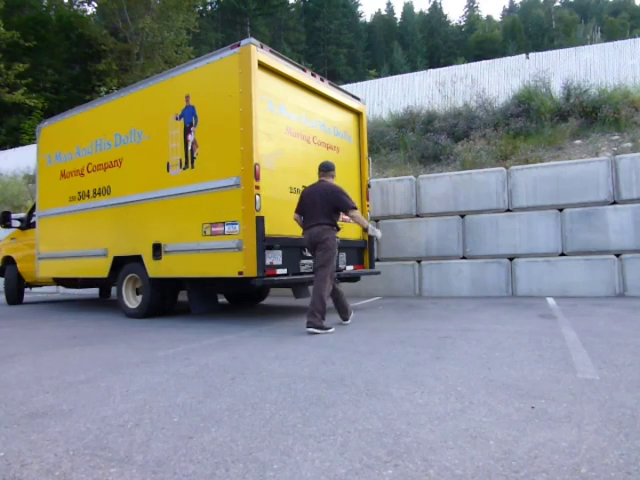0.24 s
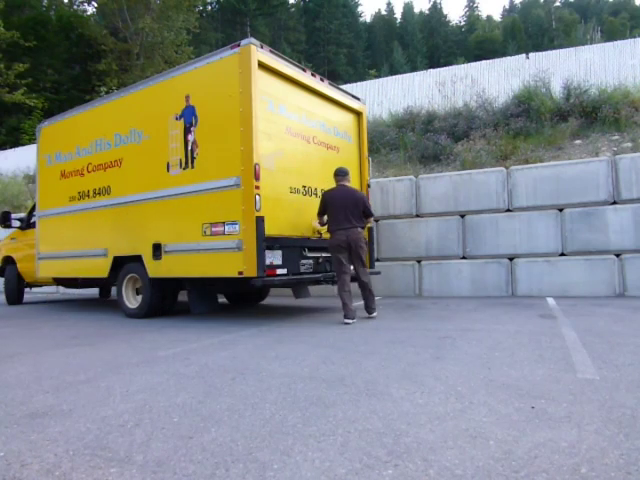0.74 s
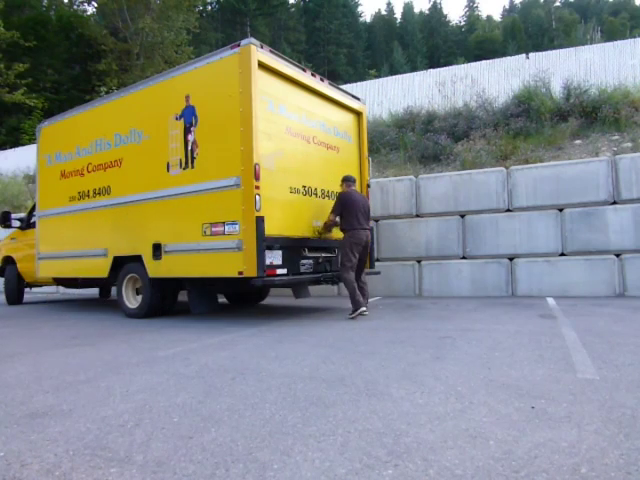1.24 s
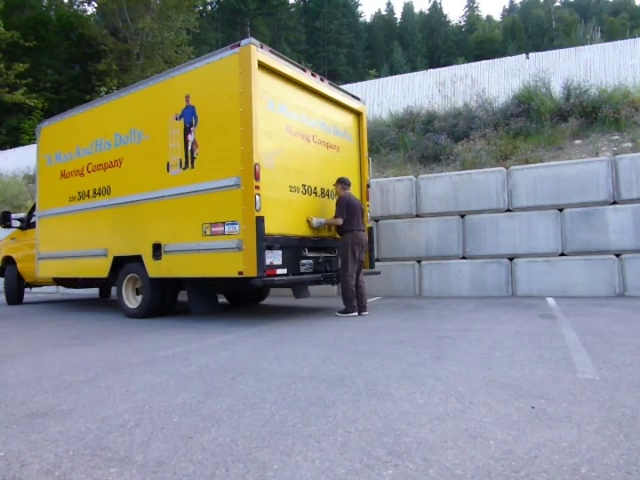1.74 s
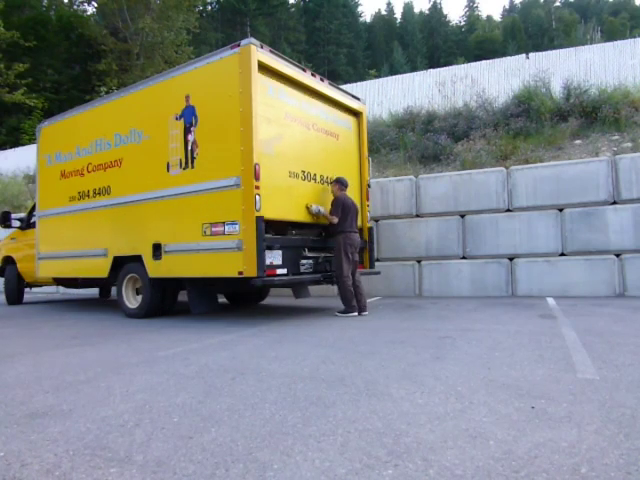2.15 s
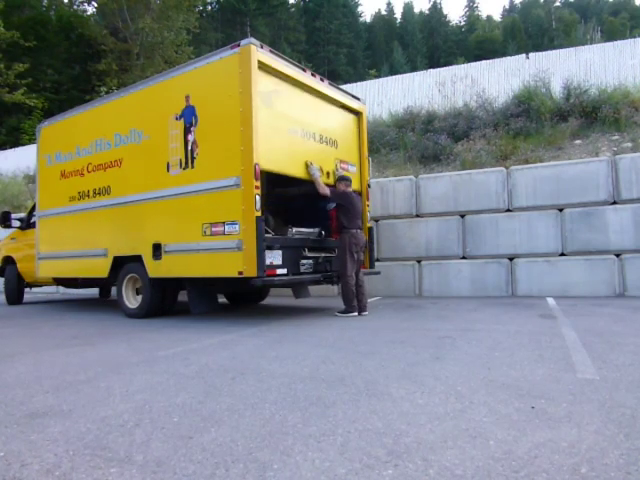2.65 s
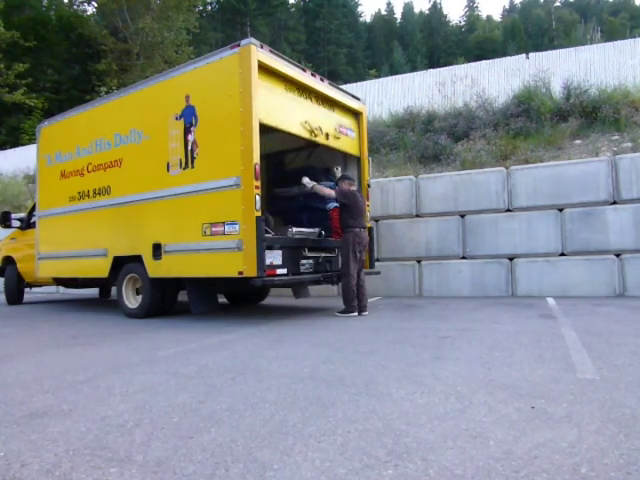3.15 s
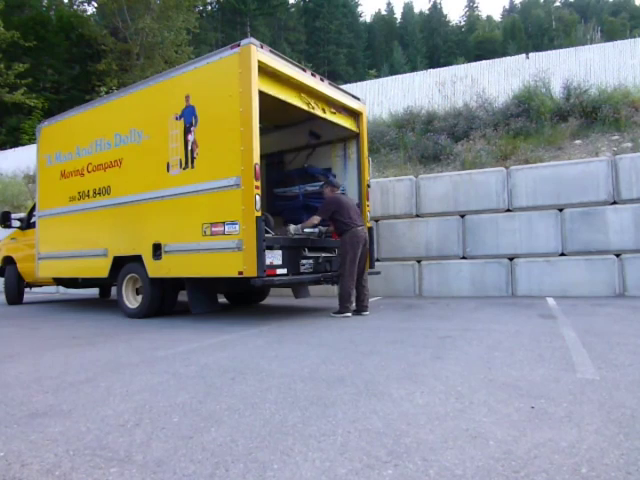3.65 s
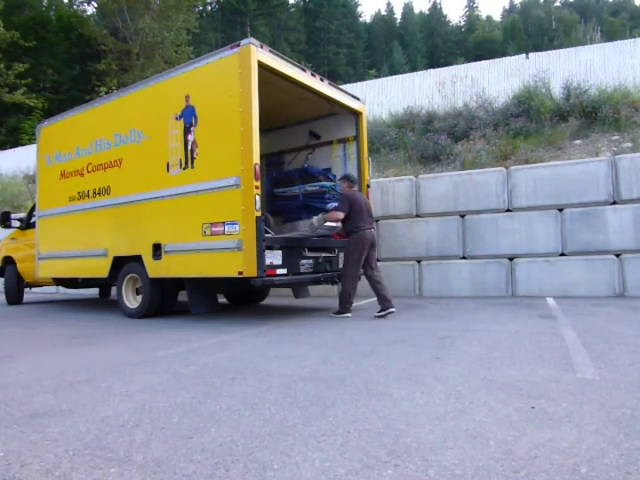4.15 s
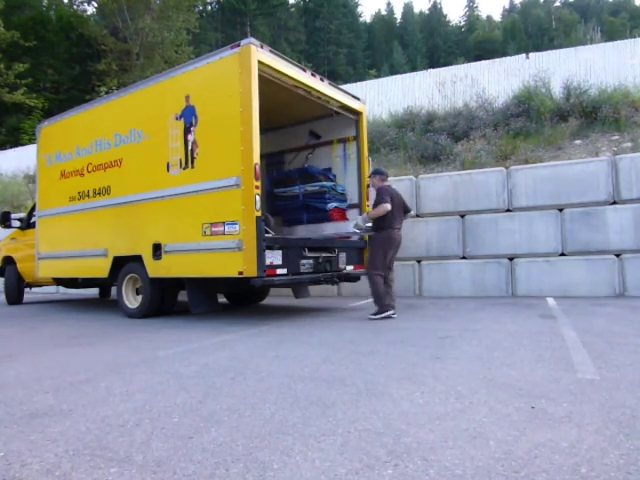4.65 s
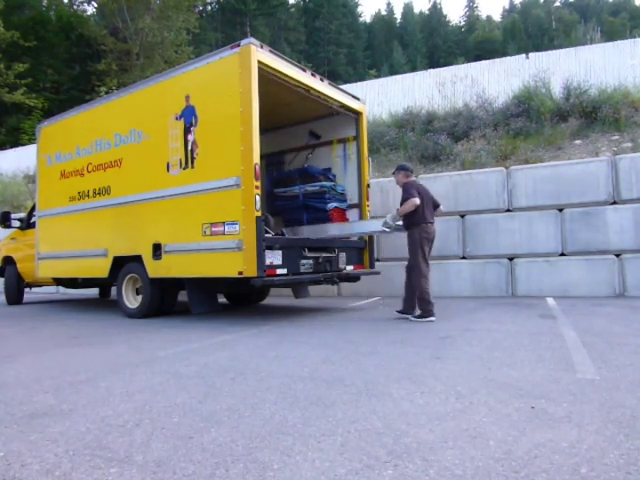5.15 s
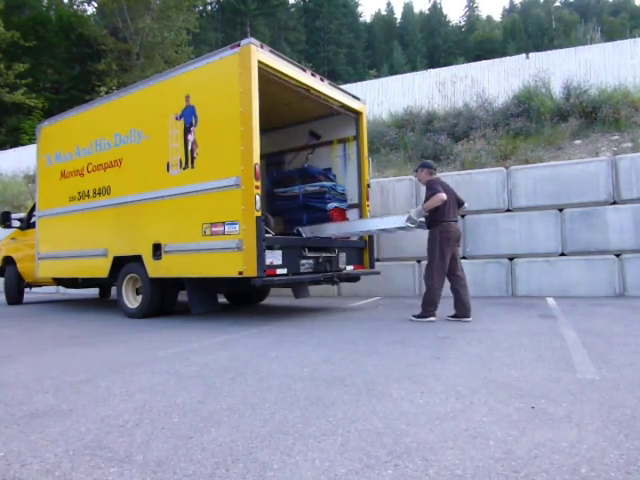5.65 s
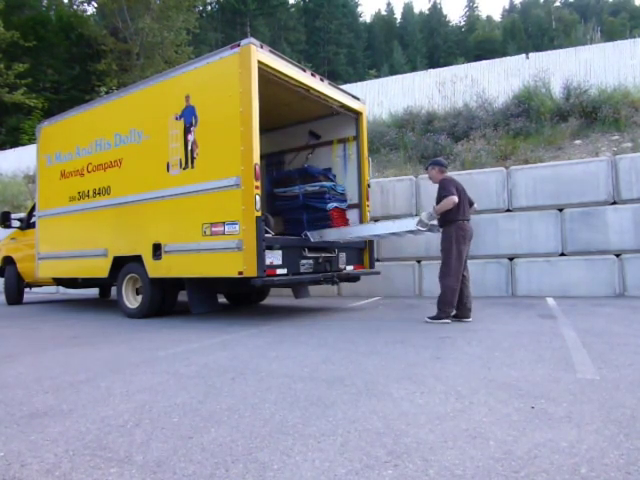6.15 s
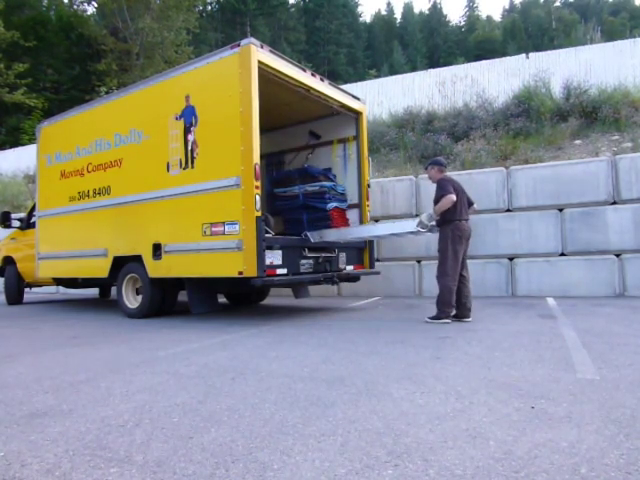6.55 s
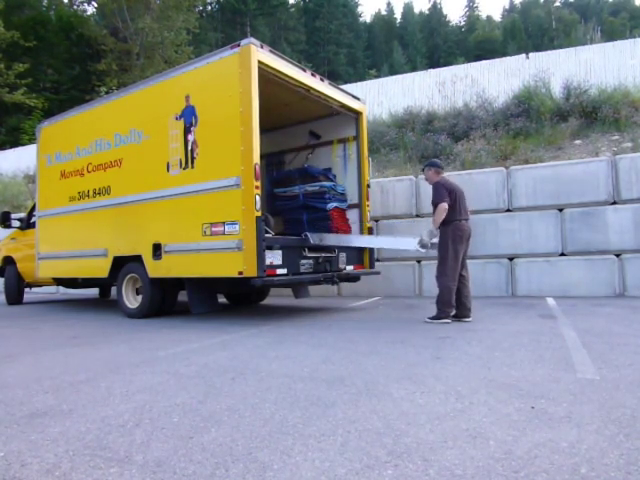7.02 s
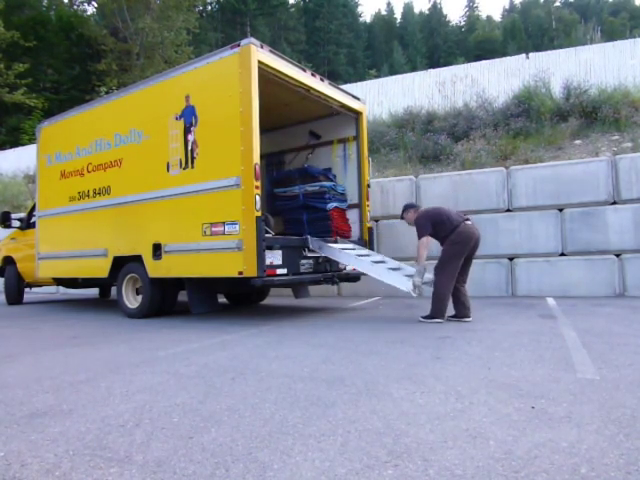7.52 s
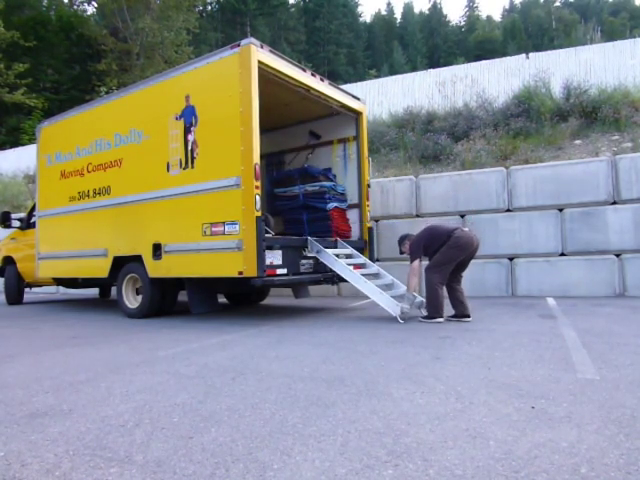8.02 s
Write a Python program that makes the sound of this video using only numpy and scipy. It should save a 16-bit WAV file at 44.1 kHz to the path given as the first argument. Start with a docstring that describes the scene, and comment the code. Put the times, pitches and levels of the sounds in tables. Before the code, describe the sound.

A parking lot with a soft, steady outdoor hush, heard in stereo a few metres from a box truck almost straight ahead. Near 0.9 s a dull bump on the door panel; from 1.06 to 1.85 s irregular steel latch blows crack, clang and ring with rattling fittings. A clink at 2.1 s, then the roll-up door rises, its rollers ticking and rattling, panels knocking hardest around 2.6 to 3.2 s, with a short squeak at 2.75 s and more knocks and clinks until 3.7 s. From 4 to 5.4 s an aluminium ramp breaks loose with a scrape and high squeak, rumbling and booming hollowly in gliding pitches. Loud ringing bangs and chatter cluster at 5.4 to 6.05 s. Faint scrape and touches come near 6.6 s, a faint low squeak and hook clanks at 7.2 to 7.4 s, and a short ringing clank on asphalt at 8.1 s.

```python
"""A parking lot, a few metres from a box truck almost straight ahead of a stereo microphone. Blows crack and
ring its steel latch, then the roll-up door rattles up its tracks as rollers jolt it and panels knock.
An aluminium ramp rumbles out on its rollers and booms in its hollow channel, bangs against its stops, drops
onto its hooks and meets the asphalt. Each metal blow is banded noise that dies away, with ringing sines.
Fittings clink, dry joints squeak, and a soft outdoor hush of shaped noise lies behind."""
import sys
import numpy as np
from scipy import signal
from scipy.fft import rfft, irfft, next_fast_len
from scipy.io import wavfile
from scipy.ndimage import uniform_filter1d

SR = 44100
rng = np.random.default_rng(int(sys.argv[2]) if len(sys.argv) > 2 else 0)


def store_wav(level_fs):
    """Save 16-bit WAV to argv[1]."""
    pcm = np.round(np.clip(np.atleast_2d(level_fs), -1, 1) * 32767)
    wavfile.write(sys.argv[1], SR, pcm.T.astype(np.int16))


N = 365148

# Ramp blows at the stops, at full length, lifted, on the hooks, on the asphalt:
# [t/s, level/dB, hardness/dB, rail ring re level/dB]
RAMP_BLOWS = [(5.435, -19, -4.5, -17), (5.47, -11.5, -2.5, -5), (5.503, -19, -2, -35),
              (5.553, -15, -3.5, -30), (5.606, -13, -1.5, -31), (5.626, -12.5, 2.5, -31),
              (5.696, -16.5, -1.5, -45), (5.928, -10, 2.5, -30), (5.948, -12, 0.5, -12),
              (6.006, -15, 2, -0.5), (6.041, -17.5, 3, -3), (6.558, -24, 0, -40), (6.682, -28.5, -10.5, -7),
              (7.303, -16.5, 1, -30), (7.346, -15, -4.5, -19), (7.37, -17.5, 5.5, -11),
              (7.385, -23, 4.5, -10), (8.094, -20, -1.5, -6), (8.112, -15, 1.5, 0.5),
              (8.126, -25.5, -3.5, -6)]
# Side rails and foot of the ramp: [f/Hz, relative level/dB, t60/s]
RAIL_MODES = [(517, -11, .3), (582, -12, .45), (678, -6, .3), (790, -3, .33), (825, -1, .5), (866, 0, .25),
              (937, -8, .2), (1025, -7, .25), (1275, -11, .2), (1486, -16, .4), (2383, -22, .45)]
# Hollow channel that holds the ramp: [f/Hz at rest, relative level/dB, t60/s]
CHANNEL_MODES = [(260, -5, 0.26), (284.4, -5, 0.34), (318.3, 2.5, 0.2), (400, -4.5, 0.23),
                 (443.5, -11, 0.55), (624, -8, 0.18)]
# Main channel resonance as the ramp bears on other spots; the other modes shift in step: [t/s, f/Hz]
CHANNEL_PITCH = [(4.0, 317), (4.151, 300.6), (4.551, 385.3), (4.849, 320.9), (5.301, 314.2), (5.55, 408.8)]
# Boom of the channel as the ramp bears down on it: [t/s, level/dB]
BOOM = [(3.95, -36), (3.995, -16), (4.17, -14), (4.22, -21), (4.48, -21.5), (4.545, -15), (4.59, -27.5),
        (4.82, -29), (4.885, -17.5), (4.913, -25), (4.945, -15), (4.99, -25.5), (5.05, -27), (5.1, -56),
        (5.25, -32), (5.42, -53), (5.58, -12.5), (5.66, -27)]
# Effort of pulling the ramp, and of lifting the door: [t/s, effort/dB]
RAMP_EFFORT = [(3.95, -42.5), (4.07, -28.5), (4.17, -16), (4.29, -21), (4.47, -26), (4.55, -24),
               (4.69, -27), (4.8, -33), (4.95, -28), (5.08, -39), (5.15, -44.5), (5.22, -35), (5.376, -33),
               (5.42, -42), (5.75, -30), (5.9, -32)]
DOOR_EFFORT = [(2.03, -50), (2.19, -36.5), (2.292, -34), (2.874, -24), (3.042, -25), (3.27, -32),
               (3.694, -31.5), (3.802, -31), (3.95, -38.5)]
USUAL_EFFORT_DB = -29.5
# Rows for rumble, clatter and scrape: [level at the usual effort/dB, growth/(dB per dB of effort)]
# A growth below 0.1 is taken as 0.1.
RAMP_LAYERS = [(-26, 0.57), (-28, 0.86), (-45.5, 0.068)]
DOOR_LAYERS = [(-26, 0.61), (-34.5, 1), (-38, 0.66)]
# The ramp's hooks scrape up to a contact: [t of the contact/s, level/dB]
HOOK_SCRAPES = [(6.563, -32.5), (7.301, -31)]
# Door panels knocking in their tracks: [t/s, level/dB, hardness/dB]
DOOR_KNOCKS = [(0.867, -44, -18), (1.441, -23.5, -20.5), (2.209, -30.5, 3.5), (2.488, -36.5, 14),
               (2.624, -28, -1), (2.646, -16, -7), (2.799, -17, -3), (2.927, -20.5, -3), (2.952, -15, -5.5),
               (2.983, -12.5, -6), (3.019, -24, -11), (3.045, -25, -7), (3.147, -19.5, 0),
               (3.164, -21, 0.5), (3.2, -22, 0), (3.434, -19, -5), (3.547, -21, -0.5), (3.612, -29, 6.5),
               (3.67, -24.5, -8), (3.724, -22, 3)]
# The door is bumped by a hand, then by its latch: [t/s, level/dB]
DOOR_BUMPS = [(0.867, -27), (1.061, -23)]
# Latch blows: [t/s, level/dB, hardness/dB, hook ring re level/dB, plate clang/dB, f favoured by the spot/Hz]
LATCH_BLOWS = [(1.063, -26.5, 4, -13, -21, 5630), (1.095, -20.5, 2, -23, -15, 5600),
               (1.216, -20.5, -10.5, -35, -16.5, 2380), (1.26, -25.5, -9, -35, -24, 5330),
               (1.297, -16, 1.5, -15, -7, 1230), (1.388, -28, -4, -23, -26, 2800),
               (1.435, -14, -3.5, -12, -20, 1550), (1.462, -27, 5.5, -24, -24.5, 3000),
               (1.588, -20.5, 1, 2.5, -23, 1550), (1.603, -37, -7, -14, -24, 5700),
               (1.663, -28, 6.5, -6, -25, 7600), (1.711, -15.5, -5, -30, -16, 1360),
               (1.743, -27, -6, -22, -28, 5700), (1.765, -23, -6.5, -16, -28.5, 1590),
               (1.821, -18, -8, -30, -33, 1540), (1.832, -21.5, 4, -9, -14, 3020),
               (1.848, -22, 1.5, -13, -31, 3000)]
# Steel hook of the latch: [f/Hz, relative level/dB, t60/s]
HOOK_MODES = [(1480, 2, .06), (2760, -2, .05), (4110, -7, .07), (5480, -5, .05), (7088, -10, .15),
              (7300, -4, .18), (7704, -4, .22), (7910, -13, .15), (9055, -15, .2), (10013, -19, .2),
              (10770, -21, .1), (11200, -21, .2), (14310, -24, .18)]
# Steel rollers and fittings clinking: [t/s, level/dB, long ring re level/dB]
CLINKS = [(2.104, -13.5, -18), (2.445, -24, -5), (2.802, -28, 0), (3.549, -28, -14), (3.612, -23, -8),
          (3.724, -18.5, 6)]
# Small steel fittings: [f/Hz, relative level/dB, t60/s]
CLINK_MODES = [(3919, -10, .16), (4110, -11, .04), (4750, -6, .012), (5200, -2, .018), (5486, -7, .07),
               (5900, -1, .014), (6700, -8, .01), (9000, -16, .015)]
# Dry joints of door and ramp: [t/s, fade time constant/s, f/Hz, level/dB, sag as a share of the pitch]
SQUEAKS = [(2.755, .07, 715, -15.5, .03), (4.158, .07, 5270, -24.5, .04), (4.628, .04, 4030, -34, .025),
           (4.762, .025, 5050, -43, .04), (7.23, .06, 650, -38, .1)]
# Outdoor hush: [t/s, level/dB]
AIR_LEVEL = [(0, -41), (1, -40.5), (7, -46), (8.3, -43.5)]
# Spectral colours of the sources: [f/Hz, relative density/(dB per Hz)]
RAMP_COLOUR = [(50, -19), (144, -1.5), (320, 5.5), (430, 7.5), (620, -1.5), (829, -7), (1050, -15),
               (1700, -17.5), (1970, -23.5), (6380, -36), (7020, -34.5), (10100, -44.5), (13400, -79)]
SLIDE_COLOUR = [(50, -36), (98, -10), (211, -2.5), (244, 4.5), (317, 0), (578, 0), (870, -8.5), (1000, -9),
                (2270, -30), (4340, -38.5), (5790, -44), (14100, -49), (15500, -70)]
DOOR_COLOUR = [(50, -20.5), (187, -0.5), (295, -3.5), (423, -3.5), (652, 0.5), (1220, -8.5), (2330, -9),
               (3580, -15.5), (4040, -14), (4340, -9.5), (5390, -18.5), (14100, -33), (15500, -86)]
LATCH_COLOUR = [(100, -19.5), (386, -4), (742, -4.5), (1460, 3), (2320, -9.5), (2870, -3.5), (3610, -19),
                (4020, -14), (5510, -10.5), (6660, -16.5), (7560, -36), (8410, -13), (14500, -39),
                (15500, -36)]
AIR_COLOUR = [(40, -8), (80, -20), (125, 2), (190, 3), (300, 1), (500, 0), (850, -4.5), (1250, -10.5),
              (3500, -24), (5000, -21), (11500, -33.5), (15000, -57)]
# Dying away of the ramp, and of the cargo box: [f/Hz, t60/s]
RAMP_DECAY = [(100, 1), (350, 1), (900, 0.79), (2500, 0.53), (6000, 0.46), (13000, 0.14)]
BOX_DECAY = [(100, 0.33), (400, 0.8), (1500, 0.72), (5000, 0.34), (13000, 0.34)]
# Stereo image at the microphone: [f/Hz, left-right likeness from 0 to 1]
LIKENESS = [(30, 0.96), (120, 1), (300, 1), (1000, 0.95), (3000, 0.83), (13000, 0.83)]
# Centres of the crowded latch plate modes, and of the ticks of loose door rollers: [f/Hz]
PLATE_HZ = np.geomspace(1100, 8600, 19)
TICK_HZ = np.geomspace(1200, 5600, 14)
# Third-octave band centres: [f/Hz]
BAND_HZ = 25 * 2 ** (np.arange(29) / 3)
ZONE_EDGES_HZ = (700, 2500)  # between bass, middle and treble


def ramp_slide(deck):
    """The ramp breaks loose, rumbles over its rollers and makes its hollow channel boom."""
    jolt = dying(RAMP_DECAY, crack_t60=0.026, tail_db=-11.5)
    zones = rollers(deck, SLIDE_COLOUR, jolt, per_s=130, spread_db=2.3, shift_db=7)
    zones = [evened(zone, size=4000) for zone in zones]
    grit = from_db(1.5 * wobble(size=300))  # it sticks and slips finely
    effort = grit * gains_in_time(RAMP_EFFORT)[0]
    rumble, clatter, scrape = driven(effort, RAMP_LAYERS, zones)
    # It scrapes more while it is breaking loose: up to 12.5 dB
    sticking = from_db(12.5 * swell(4.003, hold_s=0, attack_s=0.02, release_s=0.41))
    boom = gains_in_time(BOOM)[0] * channel_boom()
    return rumble + clatter + sticking * scrape + boom


def channel_boom():
    """Random bumps ring the channel's modes, whose pitches glide together; rms 1."""
    bumps = jolts(per_s=580, spread_db=3.0)
    boom = np.zeros(N)
    for k, (hz, db, t60) in enumerate(CHANNEL_MODES):
        boom += (-1) ** k * from_db(db) * ring(bumps, hz, t60)
    main_hz = CHANNEL_MODES[2][0]
    pitch = np.interp(np.arange(N) / SR, *np.transpose(CHANNEL_PITCH)) / main_hz
    # Reading the ringing faster or slower bends its pitch
    bent = np.interp(np.cumsum(pitch), np.arange(N), rms_one(boom), period=N)
    return evened(bent, size=1200)


def ramp_clanks(deck):
    """The long aluminium deck crashes and bounces, and its side rails ring on."""
    envelope = dying(RAMP_DECAY, crack_t60=0.19, tail_db=-3.0)
    octaves_up = np.maximum(np.log2(BAND_HZ / 4500), 0)
    crash = np.zeros((2, N + SR))
    for s, db, hardness_db, _ in RAMP_BLOWS:
        gains = contact_gains(RAMP_COLOUR, db, hardness_db, thud_db=-4.0, edge_db=-10.5, thud_loss=0.66)
        tilt_db = 3.5 + 0.31 * db  # per octave: stronger blows have more top treble
        gains = gains * from_db(tilt_db * octaves_up)
        at = round(s * SR)
        crash[:, at:at + SR] += bounces() * blow(deck, gains, envelope)
    s, level_db, _, ring_db = np.transpose(RAMP_BLOWS)
    rails = struck_modes(s, level_db + ring_db, RAIL_MODES, scatter_db=1, detune=.006)
    shudder = 1 + .35 * wobble(size=130)  # the loose deck shudders, which roughens the ring
    return crash[:, :N] + shudder * rails


def bounces(count=4):
    """Envelope of one blow on the ramp: a few sharp, uneven touches over the spreading ring of the deck."""
    touch_s, rise_s = .0028, 0.0094  # a touch peaks, and the blow spreads through the deck
    t = np.arange(SR) / SR
    gaps = rng.uniform(.007, .022, count)  # seconds
    touches = np.zeros(SR)
    for k, start_s in enumerate(np.cumsum(gaps) - gaps[0]):
        age = np.maximum(t - start_s, 0) / touch_s
        touches += from_db(-2.5 - 2 * k) * age * np.exp(1 - np.minimum(age, 20))  # 2 dB lost each time
    return touches + from_db(-2) * (1 - np.exp(-t / rise_s))


def ramp_rattle(deck):
    """Between its blows against the stops the loose ramp keeps chattering in the channel."""
    envelope = dying(RAMP_DECAY, crack_t60=0.032, tail_db=-5)
    touch = blow(deck, band_gains(RAMP_COLOUR, [-2, -1, -10]), envelope)
    chatter = rms_one(repeated(jolts(per_s=270, spread_db=-1.0), touch))
    return from_db(-22) * swell(5.49, hold_s=0.27, attack_s=0.039, release_s=0.096) * chatter


def hook_scrapes(deck):
    """The hooks grate along the sill, louder and louder until they catch."""
    envelope = dying(RAMP_DECAY, crack_t60=0.042, tail_db=-5)
    touch = blow(deck, band_gains(RAMP_COLOUR, [-2, -1, -7]), envelope)
    grating = rms_one(repeated(jolts(per_s=1300, spread_db=-1), touch))
    level = sum(from_db(db) * swell(s, hold_s=0, attack_s=0.017, release_s=0.027) for s, db in HOOK_SCRAPES)
    return grating * level


def door():
    """A bump on the panel, then rollers chatter up the tracks while the hinged panels knock."""
    panels = noise_bands(2 * SR, ripple_db=2.3)
    s, bump_db = np.transpose(DOOR_BUMPS)
    panel_modes = [(248, -7.5, 0.19), (272, -3, 0.32), (520, -23, .1)]  # f/Hz, relative level/dB, t60/s
    bump = struck_modes(s, bump_db, panel_modes, scatter_db=0.5)
    chatter = dying(BOX_DECAY, crack_t60=.045, tail_db=-16)
    rumble, clatter, scrape = rollers(panels, DOOR_COLOUR, chatter, per_s=110, spread_db=2.6, shift_db=5)
    zones = [rumble, clatter, evened(scrape, size=350)]
    roll = sum(driven(gains_in_time(DOOR_EFFORT)[0], DOOR_LAYERS, zones))
    envelope = dying(BOX_DECAY, crack_t60=0.071, tail_db=-8.0)
    knocks = blows(panels, DOOR_KNOCKS, DOOR_COLOUR, envelope, thud_db=-9, edge_db=-0.5, thud_loss=0.59)
    return bump + roll + knocks


def door_ticks():
    """Loose rollers tick irregularly in the tracks, each at its own pitch, louder with the lifting effort."""
    ticks = np.zeros(N)
    for hz in TICK_HZ:
        ticks += ring(jolts(per_s=9, spread_db=3.5), hz, t60=.011)
    clatter_growth = DOOR_LAYERS[1][1]
    return driven(gains_in_time(DOOR_EFFORT)[0], [(-38, clatter_growth)], [rms_one(ticks)])[0]


def latch():
    """Steel hook and handle crack against their keeper and ring; loose fittings rattle on and the box answers."""
    steel = noise_bands(2 * SR, ripple_db=4)
    envelope = dying(BOX_DECAY, crack_t60=0.069, tail_db=-11)
    cracks = blows(steel, LATCH_BLOWS, LATCH_COLOUR, envelope, thud_db=-0.5, edge_db=2.5, thud_loss=-0.054)
    s, level_db, hardness_db, ring_db, *_ = np.transpose(LATCH_BLOWS)
    hook = struck_modes(s, level_db + ring_db, HOOK_MODES, scatter_db=3.5)
    # Each blow sets the fittings shaking, and the shaking dies away
    kicks, shaking_t60 = np.zeros(N), .45
    kicks[np.round(s * SR).astype(int)] = from_db(level_db + hardness_db)
    shaking = signal.lfilter([1], [1, -from_db(-60 / (shaking_t60 * SR))], kicks + 1e-18)
    tick = blow(steel, band_gains(LATCH_COLOUR), dying(BOX_DECAY, crack_t60=.012, tail_db=-40))
    rattle = rms_one(repeated(jolts(per_s=180, spread_db=3), tick))
    return cracks + from_db(-16.0) * shaking * rattle + hook


def latch_plate():
    """The latch plate clangs briefly; the spot hit favours the modes near one pitch."""
    s, *_, clang_db, spot_hz = np.transpose(LATCH_BLOWS)
    clang = np.zeros(N)
    for k, hz in enumerate(PLATE_HZ):
        level_db = clang_db - 9.5 * abs(np.log2(hz / spot_hz))  # 9.5 dB lost per octave from the spot's pitch
        mode = [(hz, -3.5, 0.042)]  # f/Hz, relative level/dB, t60/s
        clang += (-1) ** k * struck_modes(s, level_db, mode, scatter_db=3.5, detune=.035)
    return clang


def clinks():
    """Small steel parts tick as they touch, and ring on where they hang free."""
    s, level_db, ring_db = np.transpose(CLINKS)
    ticking = [mode for mode in CLINK_MODES if mode[2] < .03]
    ringing = [mode for mode in CLINK_MODES if mode not in ticking]
    ticks = struck_modes(s, level_db, ticking, scatter_db=1.5)
    return ticks + struck_modes(s, level_db + ring_db, ringing, scatter_db=1.5)


def squeak():
    """Dry joints catch at once, slip roughly around their pitch, and fade."""
    t, out = np.arange(N) / SR, np.zeros(N)
    slips, grip = wobble(size=40) ** 2, 1 + .5 * wobble(size=70)
    attack_s = .002
    for s, dying_s, hz, db, sag in SQUEAKS:
        age = np.clip((t - s) / dying_s, 0, 20)
        pitch = hz * (1 - sag * slips * np.exp(-age / 2))
        catch = 1 - np.exp(-age * dying_s / attack_s)
        tone = np.sin(2 * np.pi * np.cumsum(pitch) / SR)
        out += from_db(db) * catch * np.exp(-age) * tone
    return grip * out


def air():
    """Steady outdoor noise in third-octave bands; its level sinks a little after the loud blows begin."""
    hush = np.tensordot(band_gains(AIR_COLOUR).astype(np.float32), noise_bands(N), 1)
    return gains_in_time(AIR_LEVEL)[0] * hush


def rollers(bands, colour, envelope, per_s, spread_db, shift_db, count=4):
    """Rollers jolt the metal at their own spots as the load shifts; bass, middle and treble, each of rms 1."""
    loads = from_db(shift_db * np.array([wobble(size=4000) for _ in range(count)]))
    loads = loads / np.linalg.norm(loads, axis=0)
    sound = np.zeros((2, N))
    for load in loads:
        touch = blow(bands, band_gains(colour), envelope)
        sound += repeated(load * jolts(per_s, spread_db), touch)
    zones = []
    for hz, kind in [(ZONE_EDGES_HZ[0], "low"), (ZONE_EDGES_HZ, "band"), (ZONE_EDGES_HZ[1], "high")]:
        sos = signal.butter(2, hz, kind, fs=SR, output="sos")
        zones.append(rms_one(signal.sosfiltfilt(sos, sound)))
    return zones


def driven(effort, layers, zones):
    """Each layer grows with the effort by a power law."""
    push = effort / from_db(USUAL_EFFORT_DB)
    return [from_db(db) * push ** max(growth, .1) * zone for (db, growth), zone in zip(layers, zones)]


def blows(bands, rows, colour, envelope, thud_db, edge_db, thud_loss):
    """Play a table of contacts, each with its own strength and hardness."""
    out = np.zeros((2, N + SR))
    for s, db, hardness_db, *_ in rows:
        at = round(s * SR)
        gains = contact_gains(colour, db, hardness_db, thud_db, edge_db, thud_loss)
        out[:, at:at + SR] += blow(bands, gains, envelope)
    return out[:, :N]


def contact_gains(colour, db, hardness_db, thud_db, edge_db, thud_loss):
    """Band gains of a contact: hardness adds treble edge and takes thud_loss dB of bass per dB."""
    return band_gains(colour, [db + thud_db - thud_loss * hardness_db, db, db + edge_db + hardness_db])


def blow(bands, gains, envelope):
    """One contact on sheet metal: noise for countless close modes with chance phases, dying away."""
    start = rng.integers(bands.shape[-1] - SR)
    return np.einsum("b,bt,bct->ct", gains.astype(np.float32), envelope, bands[..., start:start + SR])


def dying(decay, crack_t60, tail_db):
    """Envelope per band of a blow: a crack (t60/s at 2 kHz, longer in the bass) over a long tail."""
    t, hz = np.arange(SR) / SR, BAND_HZ[:, None]
    crack = from_db(-60 * t / (crack_t60 * (2000 / hz) ** .25))
    tail = from_db(tail_db - 60 * t / at_hz(decay, hz))
    build_up = 1 - np.exp(-t * hz)  # each band takes about a cycle
    return (np.hypot(crack, tail) * build_up).astype(np.float32)


def struck_modes(times, levels_db, modes, scatter_db, detune=0):
    """Each blow strikes each mode a little differently and may shift it by a share of its pitch."""
    out = np.zeros(N + SR)
    for k, (hz, mode_db, t60) in enumerate(modes):
        t = np.arange(int(min(t60 * 1.5, 1) * SR)) / SR
        chances = rng.standard_normal((len(times), 2))
        for s, db, (strength, shift) in zip(times, levels_db, chances):
            at = round(s * SR)
            fade = from_db(db + mode_db + scatter_db * strength - 60 * t / t60)
            tone = np.sin(2 * np.pi * hz * (1 + detune * shift) * t)
            out[at:at + len(t)] += (-1) ** k * fade * tone  # neighbours swing in opposite senses
    return out[:N]


def ring(clicks, hz, t60):
    """A unit click sets a dying sine of starting height about 1 ringing."""
    r, w = from_db(-60 / (t60 * SR)), 2 * np.pi * hz / SR
    return signal.lfilter([0, np.sin(w)], [1, -2 * r * np.cos(w), r * r], clicks + 1e-18)


def jolts(per_s, spread_db):
    """Random small contacts of uneven strength."""
    sizes = from_db(spread_db * np.minimum(rng.exponential(1, N), 4)) * rng.choice([-1, 1], N)
    return sizes * (rng.random(N) < per_s / SR)


def repeated(clicks, touch):
    """Every click sounds the same stereo touch."""
    return signal.oaconvolve(clicks[None], touch, axes=1)[:, :N]


def noise_bands(size, ripple_db=0):
    """Third-octave stereo noise (bands x 2 x size, rms 1), rippled like the crowded modes of a metal panel."""
    white = rng.standard_normal((2, 2, next_fast_len(size + 4000)))
    bins_hz = np.arange(white.shape[-1] // 2 + 1) * SR / white.shape[-1]
    modes_hz = np.cumsum(np.linspace(12, 70, 450))
    depth_db = ripple_db * np.minimum(ZONE_EDGES_HZ[1] / modes_hz, 1) ** .5  # high modes overlap and even out
    ripple = from_db(np.interp(bins_hz, modes_hz, depth_db * rng.standard_normal(len(modes_hz))))
    white = irfft(rfft(white) * ripple)
    bands = []
    for k, hz in enumerate(BAND_HZ):
        sos = signal.butter(2, [hz / 2 ** (1 / 6), hz * 2 ** (1 / 6)], "band", fs=SR, output="sos")
        mid, side = signal.sosfilt(sos, white[k % 2])[:, -size:]
        alike = np.clip(at_hz(LIKENESS, hz), 0, 1)
        bands.append(rms_one(np.sqrt(1 + alike) * mid + np.sqrt(1 - alike) * side * [[1], [-1]]))
    return np.array(bands, dtype=np.float32)


def band_gains(colour, zone_db=None):
    """Gain per band for a colour: total power 1, or bent to given bass, middle and treble levels."""
    power = from_db(at_hz(colour, BAND_HZ)) ** 2 * BAND_HZ
    if zone_db is None:
        return np.sqrt(power / power.sum())
    zone = np.digitize(BAND_HZ, ZONE_EDGES_HZ)
    lift_db = np.array(zone_db) - 10 * np.log10(np.bincount(zone, power))
    return np.sqrt(power) * from_db(uniform_filter1d(lift_db[zone], 3))  # steps between zones are smoothed


def gains_in_time(rows):
    """Gain curves from rows of (t/s, level/dB, ..), faded out beyond their ends."""
    s, *columns = np.transpose(rows)
    t = np.arange(N) / SR
    gate = np.clip(np.minimum(t - s[0], s[-1] - t) / 0.043 + 1, 0, 1)
    return [gate * from_db(np.interp(t, s, c)) for c in columns]


def swell(s, hold_s, attack_s, release_s):
    """Envelope that grows up to a moment, holds and dies away."""
    t = np.arange(N) / SR
    return np.exp(np.minimum(t - s, 0) / attack_s - np.maximum(t - s - hold_s, 0) / release_s)


def wobble(size):
    """Smooth chance that changes over the given number of samples; rms 1."""
    return rms_one(uniform_filter1d(uniform_filter1d(rng.standard_normal(N), size), size))


def evened(x, size):
    """Steady contact: level out swells longer than the given number of samples; rms 1."""
    power = uniform_filter1d(np.mean(np.atleast_2d(x) ** 2, axis=0), size)
    return rms_one(x / np.sqrt(np.abs(power) + power.mean() / 20))


def at_hz(points, hz):
    """Read a table on a log-frequency axis."""
    return np.interp(np.log(hz), np.log(np.array(points)[:, 0]), np.array(points)[:, 1])


def rms_one(x):
    """Scale to unit rms."""
    return x / np.sqrt(np.mean(x ** 2) + 1e-20)


def from_db(db):
    """Decibels to gain."""
    return 10 ** (np.asarray(db) / 20)


def scene():
    """The truck stands almost straight ahead, a touch to the right, over a soft outdoor hush."""
    deck = noise_bands(3 * SR, ripple_db=2.5)
    truck = ramp_slide(deck) + ramp_clanks(deck) + ramp_rattle(deck) + hook_scrapes(deck)
    truck = truck + door() + door_ticks() + latch() + latch_plate() + clinks() + squeak()
    # The truck sounds have little bass below about 90 Hz
    truck = signal.sosfilt(signal.butter(3, 90, "high", fs=SR, output="sos"), truck)
    return truck * from_db([[-.2], [.2]]) + air()


def record(dry):
    """At the microphone the loudest peaks clip, then the top above 15.2 kHz is cut steeply."""
    top_cut = signal.ellip(10, .1, 80, 15200, fs=SR, output="sos")
    return signal.sosfilt(top_cut, np.clip(dry, -1, 1))


dry = scene()
out = record(dry)
store_wav(out)
```